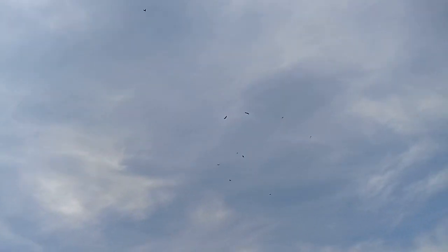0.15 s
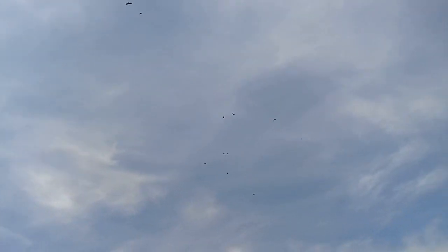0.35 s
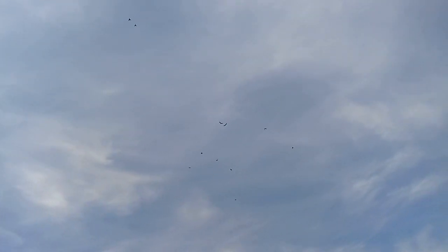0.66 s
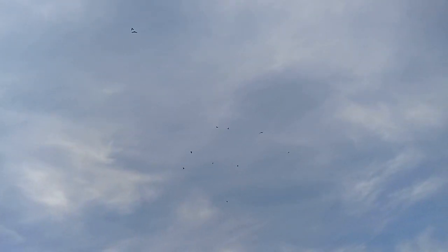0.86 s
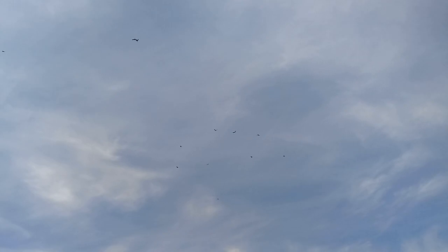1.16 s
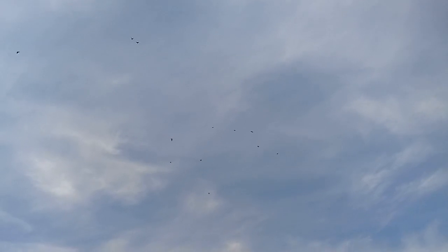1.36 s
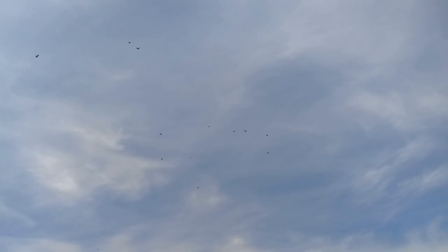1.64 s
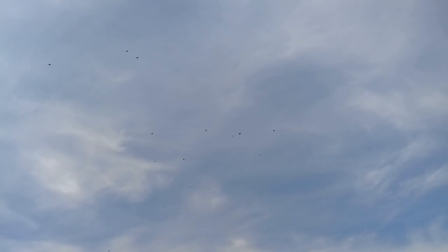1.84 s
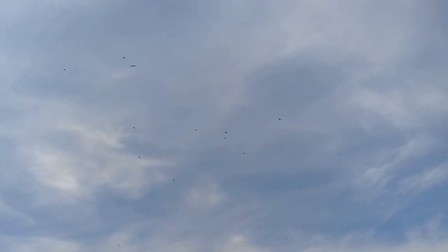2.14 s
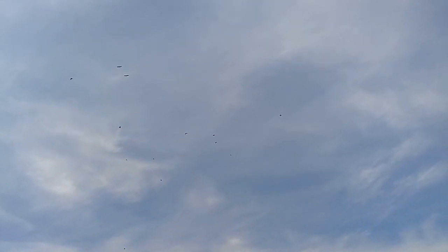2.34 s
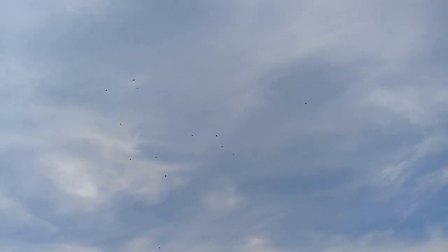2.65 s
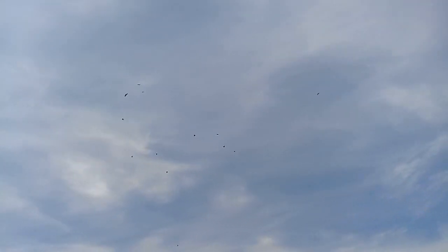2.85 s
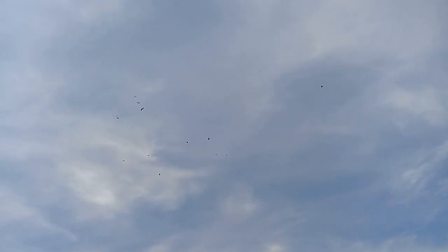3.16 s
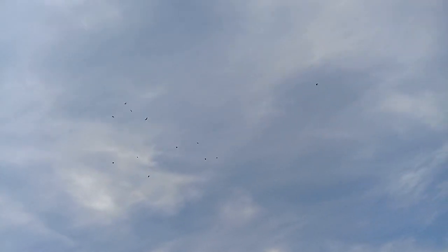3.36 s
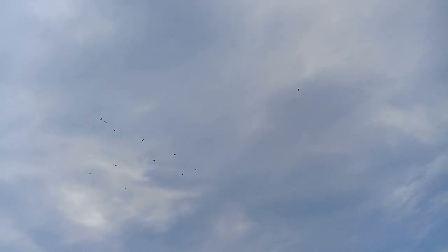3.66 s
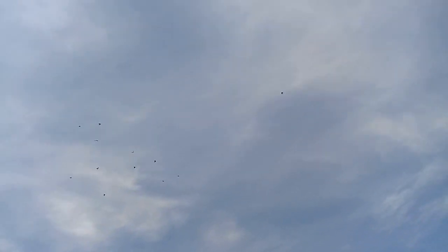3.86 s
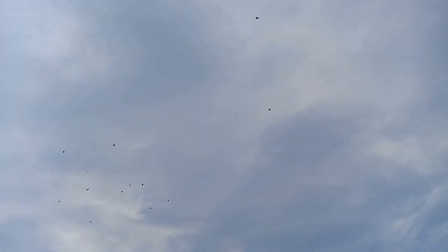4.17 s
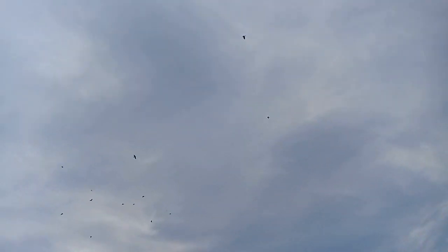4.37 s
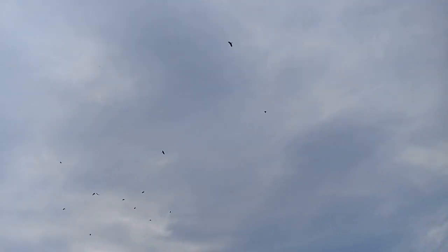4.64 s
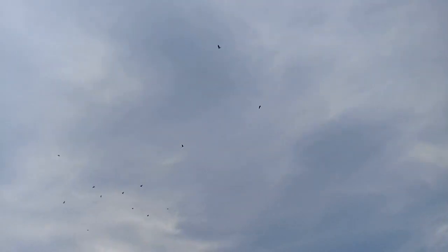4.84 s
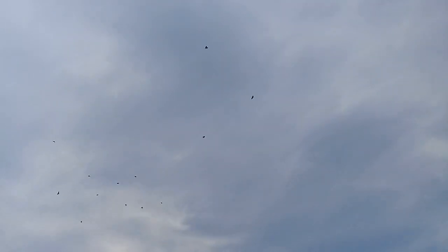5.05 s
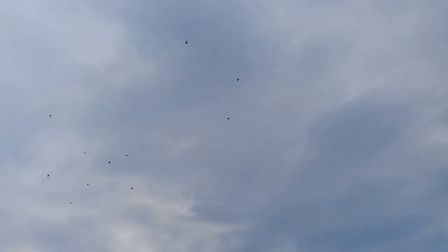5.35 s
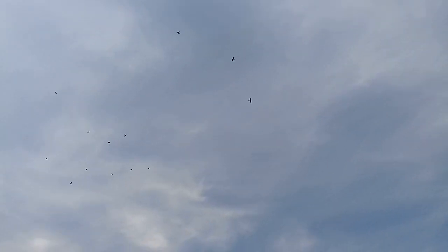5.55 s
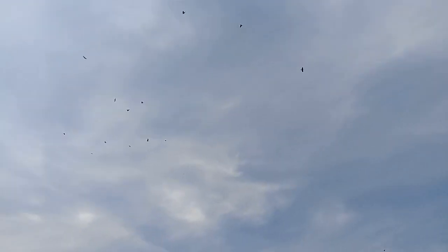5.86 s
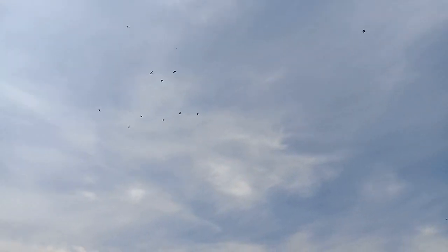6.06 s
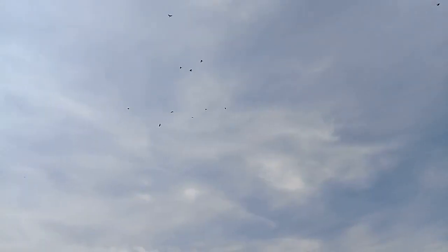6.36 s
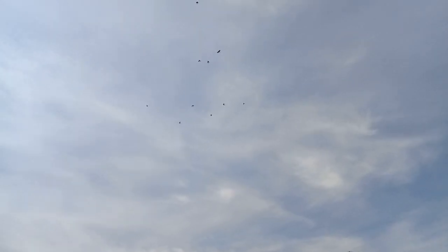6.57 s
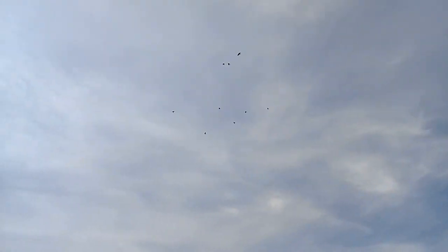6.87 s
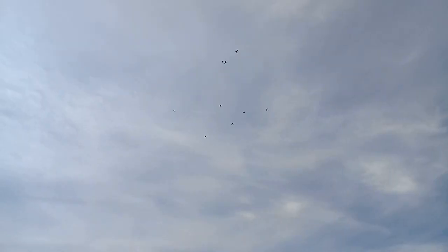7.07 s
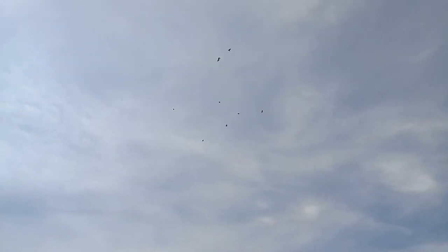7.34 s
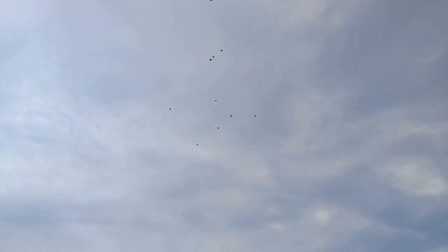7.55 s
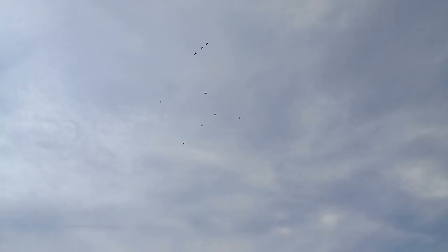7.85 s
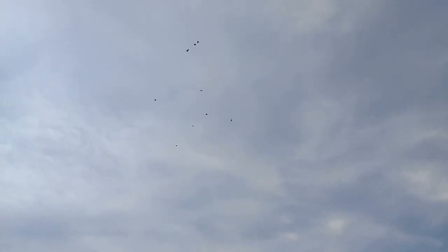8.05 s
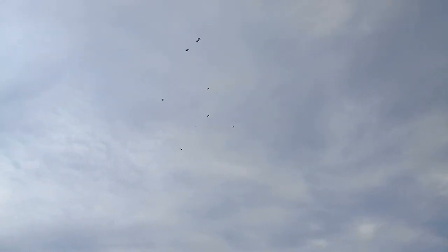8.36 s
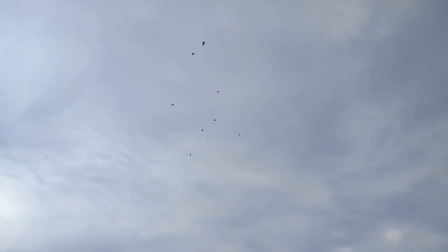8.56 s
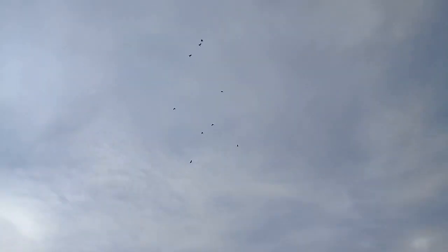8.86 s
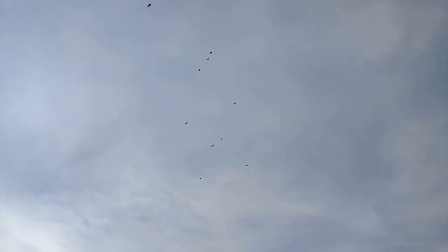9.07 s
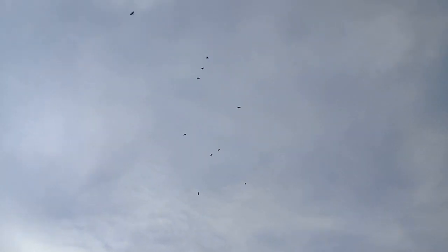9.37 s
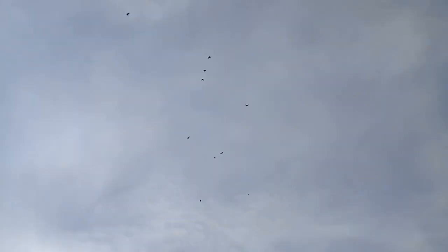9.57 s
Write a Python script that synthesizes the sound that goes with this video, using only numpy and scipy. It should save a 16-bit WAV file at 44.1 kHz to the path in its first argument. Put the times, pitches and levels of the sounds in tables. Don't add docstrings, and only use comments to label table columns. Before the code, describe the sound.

Crows caw from the first moment to the last at about ten seconds, each call a quarter-second, nasal, fluttering rasp arching slightly up and down. Hoarse, more distant voices open; near, bright caws arrive around 0.8 seconds. Wind thumps the microphone low and lumpy, heaviest between 1.2 and 1.7, then weaker. Calls continue singly and in overlapping pairs, with strong ones near 3.3, 5.9 and 6.5 and short lulls around 5. Barely audible far hoots glide by between 1 and 7. At 4.2 a finger taps the camera, a quick hard double knock. From 7.1 to 8.8 the chorus is densest and loudest. Faint scuffing starts near 6.9; a dull bump at 8.5 leads into brighter skin rubbing until 9.2. Last caws come at 9.0 and 9.5, over faint insect buzz, distant town wash and light hiss. Open air, slight scattered echo, handheld mono microphone.

```python
import sys
import numpy as np
from scipy import signal
from scipy.fft import rfft, irfft, next_fast_len
from scipy.io import wavfile
from scipy.ndimage import uniform_filter1d

SR = 44100
rng = np.random.default_rng(int(sys.argv[2]) if len(sys.argv) > 2 else 0)


def linear_from_db(decibels):
    return 10 ** (np.asarray(decibels, float) / 20)


def master_out(mix):
    frames = np.transpose(np.atleast_2d(mix))
    ceiling = np.clip(frames, -1, 1)
    pcm = np.round(ceiling * 32767).astype(np.int16)
    wavfile.write(sys.argv[1], SR, pcm)


N = 428211


def unit_rms(x):
    return x / np.sqrt(np.mean(x ** 2) + 1e-20)


def read_spectrum(points, hz):
    point_hz, value = np.transpose(points)
    return np.interp(np.log(hz + 1), np.log(point_hz + 1), value)


def add(mix, s, sound):
    part = mix[round(s * SR):][:len(sound)]
    part += sound[:len(part)]


def coloured(x, colour_db):
    size = next_fast_len(len(x))
    gain = linear_from_db(colour_db(np.fft.rfftfreq(size, 1 / SR)))
    return irfft(rfft(x, size) * gain, size)[:len(x)]


def drift(size, top_hz):
    return unit_rms(coloured(rng.standard_normal(size), lambda hz: -np.minimum(6 * (hz / top_hz) ** 2, 200)))


def resonate(x, hz, width_hz):
    carrier = np.exp(2j * np.pi * np.cumsum(hz) / SR)
    pole = np.exp(-np.pi * width_hz / SR)
    baseband = signal.lfilter([1], np.convolve([1, -pole], [1, -pole]), x / carrier)
    return unit_rms((carrier * baseband).real)


def swells(rows, rise_db_per_s, fall_db_per_s):
    t = np.arange(0, N, 64) / SR
    s, peak_db = np.transpose(rows)[:, :, None]
    gain = linear_from_db(peak_db - np.where(t < s, rise_db_per_s * (s - t), fall_db_per_s * (t - s)))
    return np.interp(np.arange(N) / SR, t, np.sqrt((gain ** 2).sum(0)))


def caw(length, level_db, top_hz, treble_db, rough):
    # (frequency [Hz], gain [dB])
    throat = [(300, -91), (600, -34.5), (950, -17.5), (1250, -12.5), (1450, -2), (1900, 1), (2350, -5),
              (2700, -24), (3100, -39.5), (4000, -77)]
    # (centre [Hz], width [Hz], level [dB], exponent of following the opening [1])
    beak = [
        (3865, 385, -26, 0.31),
        (4670, 690, -31, 1.2),
        (5940, 630, -25.5, 1.7),
        (7460, 610, -38.5, 2.2),
    ]
    size = round((length + .03) * SR)
    u = np.linspace(0, 1, size)
    top = np.clip(.45 + .0835 * rng.standard_normal(), .3, .62)
    flutter_hz = 75 + 4 * rng.standard_normal()
    throat_scale = .98 + .0058 * max(-49 - level_db, 0)

    rise = np.clip(1 - u / top, 0, 1)
    fall = np.clip((u - top) / (1 - top), 0, 1)
    start_share, end_share = .83, .84
    arch = 1 - (1 - start_share) * rise ** 2.3 - (1 - end_share) * fall ** 2.3
    rough = np.clip(rough + .3 * (rise ** 4 + fall ** 4), 0, 1)
    least_rough = rough.min()

    flutter = 2 * np.pi * np.cumsum(flutter_hz * arch * (1 + .22 * rough * drift(size, 35))) / SR
    shake_depth = 1.6 * .3
    shake = shake_depth * (1 + .22 * drift(size, 12)) * (np.sin(flutter) + .1 * np.sin(2 * flutter + 1))
    jitter = .03
    wander = 1 + .011 * np.sqrt(rough) * drift(size, 16) + jitter * rough * drift(size, 160)
    phase = 2 * np.pi * np.cumsum(top_hz * arch * wander) / SR

    spread = .62 + .4 * least_rough
    pulses = np.zeros(size)
    for k, lag in enumerate(rng.uniform(0, 2 * np.pi, 14), 1):
        pulses += np.cos(k * phase + k ** spread * shake + lag) / (1 + (k / 6.5) ** 4)
    rasp = (.46 + np.cos(phase)) * rng.standard_normal(size)
    drive = unit_rms(pulses) + .36 * (.42 + 2.5 * rough ** 2) * unit_rms(rasp)
    drive *= 1 + .12 * np.cos(flutter + .6) - (.46 - .4 * rough) * np.cos(2 * flutter)
    drive *= linear_from_db(3 * rough * drift(size, 130))

    hz, t, spectrum = signal.stft(drive, SR, nperseg=512, noverlap=384)
    hz = hz[:, None]
    opening = np.interp(t * SR / size, u, arch)
    tract = linear_from_db(read_spectrum(throat, hz / (throat_scale * opening ** .09)))
    for centre_hz, width_hz, db, follow in beak:
        pitch_luck, level_luck = rng.normal(0, 1, 2)
        centre = centre_hz * (1 + .015 * pitch_luck) * opening ** follow
        peak_db = db + treble_db * centre_hz / 5200 + 2.25 * level_luck
        tract = tract + linear_from_db(peak_db) / (1 + ((hz - centre) / width_hz) ** 4)

    shimmer = uniform_filter1d(rng.standard_normal(spectrum.shape), 9, 1)
    shimmer = unit_rms(uniform_filter1d(shimmer, 9, 1))
    shimmer_db = 4 * (1 + least_rough) * np.clip(shimmer, -2.5, 1.8)
    voice = signal.istft(spectrum * tract * linear_from_db(shimmer_db), SR, nperseg=512, noverlap=384)[1][:size]
    voice /= np.sqrt(uniform_filter1d(voice ** 2, 3000) + 1e-12)
    swell_db = -11 * rise ** 2.54 - 12 * fall ** 2.3
    return linear_from_db(level_db + swell_db) * voice * signal.windows.tukey(size, .45)


def crows():
    # (time [s], length [s], level [dB], top pitch [Hz], treble [dB])
    clear_caws = [(0.765, .25, -39.5, 471.3, 13), (0.946, .25, -43.5, 461.4, 0),
                  (2.08, 0.22, -45.5, 471, -3), (3.275, .26, -39, 482.7, 9.5),
                  (4.495, 0.26, -45, 452.3, -9), (5.43, 0.24, -44, 493.7, -4), (5.937, .275, -38, 491, 7),
                  (6.187, .23, -48.5, 453.3, 6), (6.548, .27, -38, 481, 8), (7.119, 0.27, -38.5, 477, 6),
                  (8.994, 0.25, -44, 472, 11.5)]
    hoarse_caws = [(-0.01, 0.29, -53, 444.5, -3), (0.2, 0.29, -47, 450.3, -1.5),
                   (0.38, 0.26, -48.5, 459.4, 2.5), (0.588, 0.2, -47, 480.4, -0.5),
                   (1.349, 0.28, -40.5, 458.4, 10.5), (2.658, 0.26, -44.5, 455, -3),
                   (3.046, .27, -45, 494.4, -4), (3.557, 0.31, -46, 491, -1.5),
                   (3.67, .26, -46, 494.7, 2.5), (3.878, 0.25, -44.5, 446, -2),
                   (4.165, .28, -43.5, 494.7, 3), (7.419, 0.25, -41.5, 491, 4.5),
                   (7.843, 0.29, -37, 478, 8.5), (8.001, .29, -41.5, 465.2, 4),
                   (8.417, 0.29, -36, 478.6, 9), (9.485, .25, -41.5, 454.3, 3.5)]
    ragged_caws = [(1.663, 0.38, -67, 492.5, -8), (1.92, 0.22, -61.5, 529, -8),
                   (2.799, .21, -51, 469.4, -9), (4.406, .16, -54, 481, -5), (4.78, .16, -79, 456, -5),
                   (5.026, .19, -73, 450, 13), (5.679, 0.2, -64.5, 445, 9), (6.417, 0.084, -69, 462, 1),
                   (6.847, 0.17, -67, 434, 10), (7.551, 0.24, -42.5, 465.6, 0),
                   (8.578, 0.24, -39.5, 473, 7), (9.288, .13, -56, 454, -2)]
    joining_caws = [
        (-0.04, .25, -60, 518, -3),
        (0.26, 0.26, -53.5, 536, -1),
        (0.86, 0.23, -45, 514, 6),
        (3.62, 0.23, -51, 448.5, -5),
        (7.48, 0.25, -48.5, 533, 5.5),
        (7.93, 0.27, -42.5, 520, 0),
        (8.49, 0.27, -42.5, 435, 6),
    ]
    clear, hoarse, ragged = .21, .42, .75
    lead_s = .1
    flock = np.zeros(N + SR // 10)
    voices = ((clear_caws, clear), (hoarse_caws, hoarse), (joining_caws, hoarse), (ragged_caws, ragged))
    for rows, rough in voices:
        for s, *call in rows:
            add(flock, s - .014 + lead_s, caw(*call, rough))
    flock = flock[SR // 10:]

    echo_db, echo_t60_s = -13, .4
    t = np.arange(SR // 2) / SR
    reflections = (rng.random(len(t)) < .04) * (t > .012)
    echoes = rng.standard_normal(len(t)) * reflections * linear_from_db(-60 * t / echo_t60_s)
    echoes /= np.linalg.norm(echoes)
    return flock + linear_from_db(echo_db) * signal.oaconvolve(flock, echoes)[:N]


def finger_taps():
    # (time [s], level [dB], ring [Hz], t60 [s])
    taps = [(4.2308, -33, 5900, .004), (4.2311, -16, 1700, .005), (4.2301, -29, 620, .02),
            (4.231, -36, 3600, .004), (4.2392, -38, 500, .02), (4.2398, -29, 5800, .004),
            (4.2397, -25, 1900, .006), (4.2402, -34, 3900, .003), (6.2175, -54, 6200, .006),
            (6.9165, -62, 7000, .003), (7.2703, -55, 8800, .003), (7.2705, -50, 13000, .002),
            (7.2707, -55, 6000, .003), (8.469, -60, 8700, .02)]
    thumps = [
        (4.2258, -36, 205, .07),
        (4.2304, -36, 205, .035),
        (4.2313, -34, 950, .012),
        (8.467, -38.5, 120, .08),
        (9.472, -56, 210, .05),
    ]
    out = np.zeros(N)
    t = np.arange(4000) / SR
    for s, level_db, hz, t60 in taps:
        onset = np.minimum(t * hz * .75, 1) ** 2
        add(out, s, -linear_from_db(level_db - 60 * t / t60) * np.sin(2 * np.pi * hz * t) * onset)
    for s, level_db, hz, t60 in thumps:
        add(out, s, linear_from_db(level_db - 60 * t / t60) * np.sin(2 * np.pi * hz * t))
    return out


def sliding_skin():
    # (time [s], length [s], level [dB], treble over the rest [dB])
    rubs = [
        (6.885, 0.095, -79, 20),
        (8.361, 0.33, -77.5, 0.1),
        (8.465, 0.11, -76, 2),
        (8.627, .12, -64.5, 7),
        (8.62, 0.646, -71, 0.5),
        (8.752, 0.16, -63.5, 9),
        (8.896, .12, -66.5, 10),
    ]
    # (frequency [Hz], density [dB per Hz])
    body_colour = [(100, 16.5), (250, 6.5), (600, -2), (1200, 8), (2500, -2), (4400, -3.5), (5200, 0.5),
                   (6000, 1), (7300, -15.5), (8700, -7.5), (9900, -13), (11500, -6.5), (13500, -10.5),
                   (16000, -11.5)]
    split_hz = 7300
    out = np.zeros(N)
    for s, length, level_db, treble_db in rubs:
        size = len(np.arange(0, length, 1 / SR))
        slips = rng.standard_normal(size) * linear_from_db(.71 * drift(size, 60))
        low = coloured(slips, lambda hz: read_spectrum(body_colour, hz) - 60 * (hz > split_hz))
        high = coloured(slips, lambda hz: read_spectrum(body_colour, hz) - 60 * (hz <= split_hz))
        rub = (high + low * linear_from_db(-treble_db)) / np.std(high)
        add(out, s, linear_from_db(level_db + 1.9) * rub * signal.windows.tukey(size, .3))
    return out


def wind():
    # (time [s], level [dB])
    breeze_course = [(0.0, -64), (0.6, -61), (0.9, -55.5), (1.7, -53.5), (1.85, -60.5), (2.6, -67),
                     (3.6, -64.5), (4.3, -62.5), (4.85, -66), (5.0, -56.5), (6.0, -57), (6.2, -65.5),
                     (6.6, -73), (7.3, -65), (8.0, -67.5), (9.0, -66.5), (9.71, -67.5)]
    # (time [s], peak level [dB])
    buffets = [(0.27, -56), (0.43, -59), (0.73, -48.5), (1.24, -43), (1.35, -40.5), (1.59, -41.5),
               (1.73, -51), (1.92, -54), (2.32, -54), (2.72, -55), (3.16, -58), (3.225, -47.5), (3.62, -65),
               (4.0, -53.5), (4.11, -64), (4.57, -52), (4.68, -56), (4.89, -49), (5.3, -49), (5.52, -52),
               (5.62, -54), (5.92, -51), (6.03, -54), (6.65, -63), (7.22, -54), (8.11, -63), (8.5, -62),
               (9.08, -57), (9.36, -58)]
    # (frequency [Hz], density [dB per Hz])
    wind_colour = [(8.8, -62), (15, -18.5), (41, 0.5), (77, 1.5), (95, -10), (127, -8), (204, -27.5),
                   (330, -30.5), (430, -54), (730, -120)]
    lumps = rng.standard_normal(N) * linear_from_db(2.26 * drift(N, 19))
    rumble = coloured(lumps, lambda hz: read_spectrum(wind_colour, hz))
    rumble /= np.sqrt(uniform_filter1d(rumble ** 2, 7000) + 1e-20)
    s, level_db = np.transpose(breeze_course)
    breeze = linear_from_db(np.interp(np.arange(N) / SR, s, level_db))
    thumping = swells(buffets, rise_db_per_s=325, fall_db_per_s=339)
    return np.hypot(breeze, thumping) * rumble


def hoots():
    # (time [s], length [s], level [dB], start pitch [Hz], end pitch [Hz])
    far_calls = [(1.2, 0.4, -79, 1040, 1076), (2.1, .19, -69.5, 820, 760), (2.22, 0.46, -74, 985, 980),
                 (2.78, 0.14, -70.5, 878, 755), (3.36, 0.31, -75, 540, 646), (3.56, 0.23, -73.5, 780, 635),
                 (3.68, .13, -65, 356, 352), (4.43, 0.11, -72.5, 353, 348),
                 (4.702, .165, -71.5, 1854, 1750), (4.93, 0.069, -82, 1070, 1060),
                 (5.0, 0.237, -70, 860, 800), (5.029, 0.18, -72, 1820, 1842), (5.04, 0.25, -74, 680, 652),
                 (5.05, 0.28, -81, 370, 353), (5.22, 0.37, -78.5, 859, 822),
                 (6.82, 0.25, -74.5, 1923, 1910)]
    out = np.zeros(N)
    for s, length, level_db, start_hz, end_hz in far_calls:
        blur_hz = .03 * start_hz + .35 * abs(end_hz - start_hz)
        size = round(length * SR)
        hz = np.linspace(start_hz, end_hz, size)
        tone = np.cos(2 * np.pi * np.cumsum(hz + .25 * blur_hz * drift(size, blur_hz)) / SR)
        tone += blur_hz / 50 * resonate(rng.standard_normal(size), hz, 3 * blur_hz)
        fading = linear_from_db(level_db + 5.5 + 1.2 * drift(size, blur_hz))
        add(out, s, fading * tone * signal.windows.tukey(size, .4))
    return out


def insects():
    # (time of the top [s], peak level [dB])
    bouts = [
        (.55, -83.5),
        (2.35, -88),
        (2.8, -84.5),
        (4.6, -87.5),
        (5.3, -88),
        (6.95, -77.5),
        (8.1, -85),
        (9.3, -74),
        (9.7, -71.5),
    ]
    t = np.arange(N) / SR
    sag_from_s = 3.3
    hz = 4990 - 380 * np.clip((t - sag_from_s) / (t[-1] - sag_from_s), 0, 1)
    throb_hz = 62 * (1 + .05 * drift(N, 3))
    throb = 1 + .65 * np.cos(2 * np.pi * np.cumsum(throb_hz) / SR)
    buzz = resonate(throb * rng.standard_normal(N), hz, width_hz=480)
    return swells(bouts, rise_db_per_s=18, fall_db_per_s=16) * buzz


def air():
    # (frequency [Hz], density [dB per Hz])
    air_colour = [(60, -15.5), (100, -4.5), (200, -24), (350, -25.5), (700, -21.5), (1100, -29),
                  (1500, -29.5), (1900, -18), (2500, -32), (3200, -42), (5000, -39), (7000, -68.5)]
    wash = coloured(rng.standard_normal(N), lambda hz: read_spectrum(air_colour, hz) - 30 * (hz < 48))
    return linear_from_db(-64.5 + 1.4 * drift(N, 2.5)) * unit_rms(wash)


def scene():
    mono = crows() + finger_taps() + sliding_skin() + wind() + hoots() + insects() + air()
    return np.tile(mono, (2, 1))


def band_limit(x):
    return signal.sosfilt(signal.butter(12, 15820, fs=SR, output="sos"), x)


def record(dry):
    own_hiss = linear_from_db(-78) * signal.lfilter([1, -.6], 1, rng.standard_normal(dry.shape))
    shared_hiss = linear_from_db(-82) * rng.standard_normal(N)
    dry = signal.lfilter(*signal.butter(2, 34, "high", fs=SR), dry)
    return band_limit(dry + own_hiss + shared_hiss)


dry = scene()
out = record(dry)
master_out(out)
```